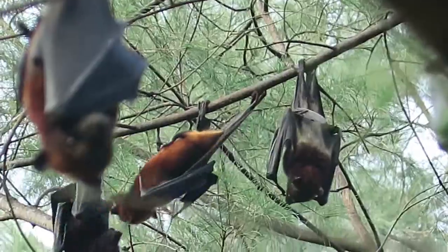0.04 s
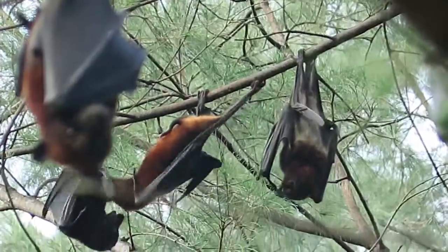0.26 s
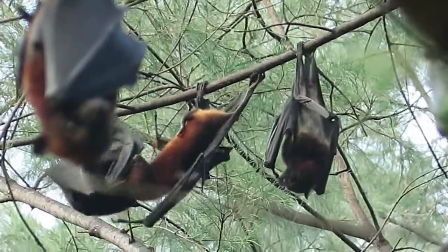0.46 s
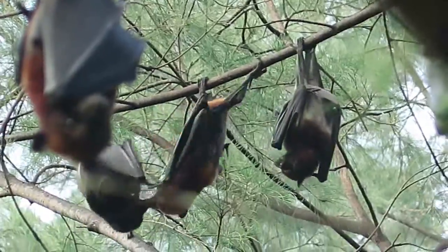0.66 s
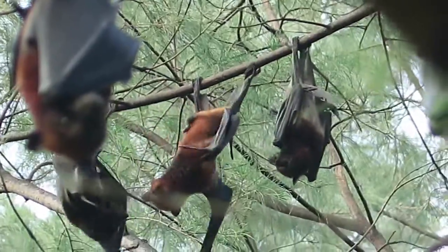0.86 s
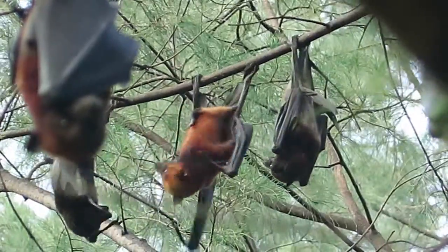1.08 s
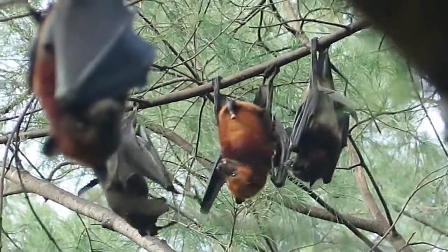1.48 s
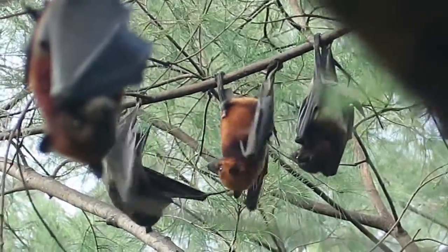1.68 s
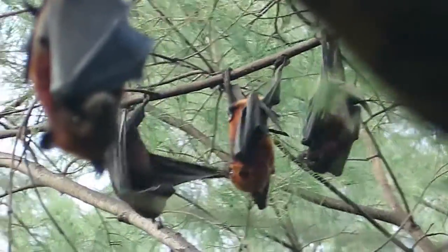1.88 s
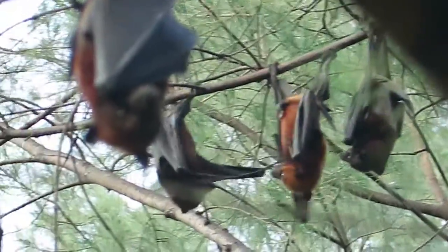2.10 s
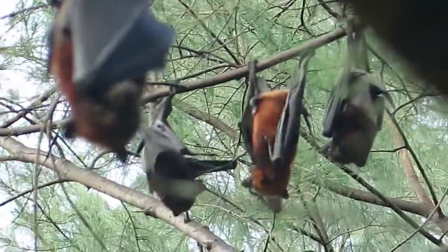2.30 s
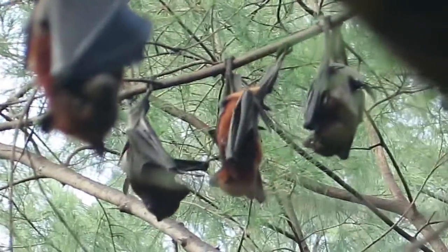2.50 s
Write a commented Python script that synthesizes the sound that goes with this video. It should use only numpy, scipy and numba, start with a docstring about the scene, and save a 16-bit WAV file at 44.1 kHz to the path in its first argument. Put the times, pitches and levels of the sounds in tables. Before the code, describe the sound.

Fruit bats squabble in a tree with five harsh, buzzing screeches and softer squawks between them. The calls weaken and break into a rattle, with a short outdoor echo, over a distant idling engine and steady hiss.

```python
"""Under a tree outdoors, an engine thumps at idle in the distance beneath a steady hiss.
A bird chirps once, and later a far whistle falls. Fruit bats squabble: five harsh screeches
break up into a rattle as the bats tire, with softer, more tonal squawks in the gaps.
Each call is a buzz of pulses and breath from the voice box, shaped by the ringing throat.
The branches scatter the calls and add a short echo."""
import sys
import numpy as np
from scipy import signal
from scipy.io import wavfile
from scipy.ndimage import uniform_filter1d
from numba import njit

SR = 44100
rng = np.random.default_rng(int(sys.argv[2]) if len(sys.argv) > 2 else 0)


def master_out(mix):
    """Clip the mix to full scale and print it as 16-bit PCM to the path in sys.argv[1]."""
    frames = np.transpose(np.atleast_2d(mix))
    ceiling = np.clip(frames, -1, 1)
    pcm = np.round(ceiling * 32767).astype(np.int16)
    wavfile.write(sys.argv[1], SR, pcm)


N = 116865
T = np.arange(N) / SR
CUTOFF_HZ = 15300  # the top of the treble

# how fast the engine idles: (time [s], firings [per s])
IDLE_SPEED = [(0, 15.8), (.7, 15.65), (1.1, 15.35), (1.6, 15.0), (2.65, 15.3)]
# the three thumps of each firing: (delay [s], relative level [dB])
FIRING_THUMPS = [(0, -8), (.012, -10), (.031, -14)]
# the notes at which the exhaust rings: (frequency [Hz], width [Hz], relative level [dB])
EXHAUST_RINGS = [(74.2, 17.7, 2), (129.5, 42, 0.5), (241.7, 70, -3), (380, 100, -9.5)]
# the outdoor air, from rumble to hiss: (frequency [Hz], relative level [dB per Hz])
AIR_SPECTRUM = [(25, -9), (125, -2.5), (219, -8.5), (243, -13), (604, -16.5), (903, -19), (1150, -23.5),
                (2430, -25), (8100, -32), (9520, -32), (15000, -43.5)]
# how alike the air sounds in both ears: (frequency [Hz], likeness [0-1])
AIR_LIKENESS = [(60, 1), (150, 0.92), (300, 0.18), (700, 0.36), (2000, 0.5), (10000, 0)]
# the rising chirp and the far falling whistle: (time [s], pitch [Hz], level [dB])
RISING_CHIRP = [(.179, 2670, -36), (.186, 2780, -28), (.191, 3260, -38.5), (.203, 3390, -43),
                (.235, 3830, -48)]
FALLING_WHISTLE = [(.85, 1853, -47), (1.0, 1871, -45), (1.12, 1788, -63), (1.3, 1763, -49),
                   (1.48, 1621, -40.5), (1.63, 1360, -52.5), (1.85, 1114, -54)]
# how loud the bats are, one list for each call: (time [s], level [dB])
SCREECH_LEVELS = [
    [(.255, -38.5), (.29, -25), (.3, -32)],
    [(.43, -30.5), (.437, -28), (.45, -14), (.485, -18), (.505, -23.5), (.55, -19.5), (.585, -17),
     (.627, -14.5), (.645, -23.5)],
    [(.777, -25), (.785, -21.5), (.791, -13.5), (.82, -16.5), (.838, -26), (.854, -15), (.878, -19),
     (.91, -20), (.95, -21), (.99, -19), (1.04, -17), (1.06, -19.5), (1.095, -24), (1.135, -20),
     (1.17, -21.5), (1.262, -21), (1.28, -30.5)],
    [(1.459, -28.5), (1.492, -18.5), (1.503, -19), (1.518, -30.5), (1.548, -27), (1.553, -21.5),
     (1.61, -23), (1.68, -31.5), (1.708, -25), (1.73, -31.5), (1.765, -30), (1.795, -36), (1.834, -28.5)],
    [(2.004, -31.5), (2.04, -27), (2.072, -38.5), (2.1, -28), (2.145, -30.5), (2.205, -37.5), (2.26, -33.5),
     (2.315, -41.5), (2.352, -32), (2.381, -36.5)],
]
SQUAWK_LEVELS = [
    [(.335, -40), (.36, -32), (.405, -33)],
    [(.65, -36.5), (.672, -26.5), (.692, -32.5), (.72, -16.5), (.738, -25.5), (.752, -31.5)],
    [(1.305, -42), (1.335, -28.5), (1.345, -24), (1.357, -30), (1.405, -24.5), (1.436, -27.5)],
    [(1.88, -33), (1.925, -34.5), (1.945, -37), (1.963, -29.5), (1.977, -39)],
    [(2.57, -55), (2.606, -46)],
]
# the buzz of the voice box: (time [s], pitch [Hz], roughness [0-1], squeal [0-1])
SCREECH_BUZZ = [(.255, 937, 0.65, 0.2), (0.297, 863, 0.36, 0.24), (0.432, 649, 0.25, 0),
                (0.449, 900.7, 0.3, 0.53), (0.49, 853.5, 0.37, 0.24), (0.534, 856, 0.51, 0.04),
                (0.611, 993, 0.74, 0.05), (.643, 721, 0.31, 0.4), (0.775, 796, 0.28, 0),
                (0.794, 1000, 0.62, 0.27), (0.823, 947, 0.63, 0.3), (0.835, 757, 0.34, 0.6),
                (0.849, 967.5, 0.16, 1), (0.865, 1019, 0.3, 0.47), (0.896, 937, 0.16, 0.4),
                (.912, 947.5, 0.22, 0.27), (0.926, 971, 0.4, .7), (0.961, 978, 0.39, 0.4),
                (0.981, 953, 0.22, 0.6), (1.017, 919.7, 0.15, 0.5), (1.043, 933.6, 0.23, 0.52),
                (1.064, 922.5, 0.62, 0.55), (1.273, 890, 1.01, 0.09), (1.489, 938, 0.68, 0.46),
                (1.829, 961, 0.89, 0.1), (1.999, 923, 0.28, 0.5), (2.018, 998, 0.49, 0.14),
                (2.081, 1010, .5, .4), (2.098, 1094, 0.24, 0.52), (2.135, 1000, .22, 0.19),
                (2.2, 993, 0.71, 0.5)]
SQUAWK_BUZZ = [(0.338, 402.4, 0.52, 0), (0.362, 487, 0.47, 0), (0.378, 575, 0.35, 0.37),
               (0.404, 425, 0.2, 0.4), (0.676, 682, 0.56, 0.1), (0.699, 819, 0.05, 0.25),
               (0.717, 876, 0.11, 0.37), (0.735, 849.6, 0.02, 0.1), (0.751, 654, .05, 0),
               (1.307, 527, 0.81, 0), (1.336, 541.7, 0.39, 0.05), (1.355, 655, 0.05, 0),
               (1.369, 762.6, 0.08, 0), (1.385, 740, 0.08, 0), (1.398, 812, 0.05, 0.1),
               (1.411, 829, 0, 0.36), (1.425, 687.7, 0.14, 0.01), (1.438, 593, 0.42, 0),
               (1.884, 891, 0.21, 0.75), (1.929, 955, 0.36, 0.55), (1.956, 881, 0.46, 0.31)]
# the rattle that chops the buzz: (time [s], beats [per s], depth [0-1])
SCREECH_CHOP = [(0.433, 423, 0.7), (0.914, 173, 0.06), (.93, 160.5, 0.63), (0.978, 152, 0),
                (1.041, 189, 0.02), (1.091, 155, 0.71), (1.136, 214, 0), (1.2, 131, 0.59),
                (1.27, 177, 0.39), (1.474, 140, 0), (1.509, 135, 0.94), (1.539, 135, 0.1),
                (1.564, 163, 0.01), (1.61, 146.5, 0.46), (1.661, 96, 0.24), (1.831, 72, 0.43),
                (2.009, 115, 0.26), (2.04, 100, 0.83), (2.112, 110, 0.4), (2.222, 90, 0.6),
                (2.361, 110, 0.38)]
SQUAWK_CHOP = [(0.339, 230, 0.38), (0.709, 200, 0), (1.321, 190, 0.36), (1.42, 230, 0.06),
               (1.881, 290, 0.98), (1.977, 223, 0.48)]
# where the throat rings and where it swallows sound: (time [s], four rings [Hz], notch [Hz])
SCREECH_RINGS = [(.28, 2620, 6640, 8600, 8700, 12900), (0.431, 2430, 5300, 8000, 9100, 13000),
                 (0.458, 3050, 6200, 8780, 9400, 13800), (.52, 2600, 6730, 8200, 9850, 14700),
                 (.575, 3140, 7400, 9100, 10300, 14300), (.63, 2810, 5750, 8100, 10800, 14240),
                 (0.802, 2840, 6240, 10100, 11300, 14700), (.86, 3000, 6430, 10100, 11450, 14600),
                 (.92, 3220, 6200, 10150, 10250, 12100), (1.021, 3110, 6000, 9000, 10960, 11800),
                 (1.1, 2950, 5560, 8900, 12900, 11250), (1.272, 2750, 5183, 8400, 12120, 10040),
                 (1.489, 2848, 5910, 8250, 10330, 11040), (1.6, 2720, 6100, 9035, 10300, 11800),
                 (1.819, 2780, 6033, 8647, 10420, 11940), (2.009, 2838, 5400, 8107, 12650, 9640),
                 (2.379, 3000, 5410, 7500, 11920, 10000)]
SQUAWK_RINGS = [(.35, 2370, 5500, 7900, 11800, 13500), (0.668, 2800, 5990, 8500, 10650, 13500),
                (.72, 2470, 6350, 8100, 11850, 13530), (1.38, 2595, 5260, 8290, 11460, 13110),
                (1.92, 2880, 5280, 8380, 11660, 9860), (1.97, 2650, 5000, 8023, 11260, 10000)]
# how broad the throat's rings are: (four widths [Hz])
SCREECH_RING_WIDTHS = [810, 1540, 1800, 2570]
SQUAWK_RING_WIDTHS = [774, 1190, 2160, 2600]
# higher rings compared with the first: (time [s], second ring [dB], top two together [dB])
SCREECH_BRIGHTNESS = [(.27, 4.5, 1.5), (.3, -8, -9), (0.449, -12, -8.5), (.485, 0.5, 11.5), (.53, 6.5, 5.5),
                      (.58, -0.5, 3), (.63, 1, 0.5), (0.788, -3.5, -4.5), (0.813, 9.5, 15.5),
                      (0.857, -4, -2.5), (.9, 3.5, 3), (0.991, 1, 2), (1.04, 0, 0), (1.149, 1, 1.5),
                      (1.27, -4, -3), (1.499, -5, -3), (1.575, -0.5, 4), (1.679, -1.5, -0.5),
                      (1.83, -2, -4.5), (2.1, -5, -4), (2.36, -1, -4.5)]
SQUAWK_BRIGHTNESS = [(.38, -8.5, -11), (.67, -5, -13), (.72, -19.5, -20), (0.75, -3, -10), (1.32, -4, -11),
                     (1.39, -12, -15), (1.917, -5.5, -18)]


def from_db(db):
    """Turn decibels into a number to multiply by."""
    return 10 ** (np.asarray(db) / 20)


def unit_power(x):
    """Scale a sound so that its average power is 1."""
    return x / np.sqrt(np.mean(x ** 2) + 1e-20)


def in_time(rows):
    """Join the rows of a table with straight lines: one curve for each column after the time."""
    times, *columns = np.transpose(rows)
    return [np.interp(T, times, column) for column in columns]


def at_hz(rows, hz):
    """Look up a table at one frequency, with octaves evenly spaced."""
    frequencies, values = np.transpose(rows)
    return np.interp(np.log(hz), np.log(frequencies), values)


def keep_band(x, hz, kind, order=2):
    """Let through the "low" part, the "high" part or a middle "band" of a sound."""
    return signal.sosfilt(signal.butter(order, hz, kind, fs=SR, output="sos"), x)


def drift(hz):
    """A smooth random wobble, about 1 in size; more hz makes it quicker."""
    return unit_power(keep_band(rng.standard_normal(N + SR), hz, "low")[SR:])


def gate(rows, attack_s=0.0049, release_s=0.0048):
    """Fade in quickly just before a table's first time, and out after its last."""
    fade_in = np.clip((T - rows[0][0]) / attack_s + 1, 0, 1)
    return fade_in * np.exp(-np.maximum(T - rows[-1][0], 0) / release_s)


def level_out(x):
    """Hold the loudness steady over a few rattle beats."""
    power = uniform_filter1d(uniform_filter1d(x ** 2, size=500), size=400)
    return x / np.sqrt(np.abs(power) + 1e-12)


@njit
def ring_loop(x, angle, decay):
    """Feed the last two samples back in, so the sound swings like a spring."""
    y = np.zeros(len(x))
    for i in range(2, len(x)):
        push = (1 - decay * decay) / 2 * (x[i] - x[i - 2])
        y[i] = push + 2 * decay * np.cos(angle[i]) * y[i - 1] - decay * decay * y[i - 2]
    return y


def ring(x, hz, width_hz):
    """Make a sound ring at a steady or moving frequency; a narrower ring lasts longer."""
    angle = 2 * np.pi * hz / SR * np.ones(N)
    return ring_loop(x + 1e-18, angle, np.exp(-np.pi * width_hz / SR))


def engine(thump_db=-35.5, hum_db=-53.5, first_firing_s=0.01347):
    """Uneven thumps make the exhaust ring; a faint hum lies on top."""
    rate, = in_time(IDLE_SPEED)
    firing_count = np.floor(np.cumsum(rate) / SR)
    firing_s = first_firing_s + T[np.diff(firing_count, prepend=-1) > 0]
    delay_s, beat_db = np.transpose(FIRING_THUMPS)
    thump_s = firing_s[:, None] + delay_s + rng.normal(0, 0.0017, (len(firing_s), len(delay_s)))
    thump_samples = (np.abs(thump_s) * SR).astype(int)
    exhaust = 0
    for k, (hz, width_hz, db) in enumerate(EXHAUST_RINGS):
        clicks = np.zeros(N + SR)
        clicks[thump_samples] = from_db(db + beat_db + rng.normal(0, 1.9, thump_s.shape))
        exhaust = exhaust + (-1) ** k * ring(clicks[:N], hz, width_hz)
    thumps = unit_power(keep_band(exhaust, 336, "low"))
    hum = unit_power(ring(rng.standard_normal(N), hz=508.4, width_hz=2.9))
    return from_db(thump_db) * thumps + from_db(hum_db) * hum


def outdoor_air(level_db=-34.5):
    """Bands of steady noise: the rumble sits in the middle and the hiss spreads wide."""
    edges_hz = 22 * 2 ** np.arange(0, 9.6, .5)  # half an octave apart
    noise = rng.standard_normal((2, 2, N + SR // 4))
    air = 0
    for k, (low, high) in enumerate(zip(edges_hz, edges_hz[1:])):
        middle, side = keep_band(noise[k % 2], [low, high], "band")[:, -N:]
        hz = np.sqrt(low * high)
        alike = at_hz(AIR_LIKENESS, hz)
        band = np.sqrt(1 + alike) * middle + np.sqrt(1 - alike) * side * [[1], [-1]]
        air = air + from_db(at_hz(AIR_SPECTRUM, hz)) * band
    return from_db(level_db) * unit_power(air)


def bird(rows, waver, fading_db=0, octave_from_hz=3100, octave_db=-1):
    """A sliding, wavering tone; when it is high, a second tone joins an octave above."""
    hz, db = in_time(rows)
    phase = 2 * np.pi * np.cumsum(hz * (1 + waver * drift(220))) / SR
    octave = from_db(octave_db) * uniform_filter1d(1.0 * (hz > octave_from_hz), size=200)
    loudness = gate(rows) * from_db(db + fading_db * drift(18.5))
    return np.sqrt(2) * loudness * (np.sin(phase) + octave * np.sin(2 * phase))


def voice_box(buzz, waver=0.01214, jitter=0.12, squeal_waver=0.0144):
    """Shaky pulses and puffs of breath; a squeal adds a purer tone at three times the pitch."""
    hz, rough, squeal = in_time(buzz)
    rough = np.clip(rough + 0.025, 0, 1)  # the voice is never quite smooth
    squeal = np.clip(squeal, 0, .95)
    squeal_phase = 2 * np.pi * np.cumsum(hz * (1 + squeal_waver * drift(121.3))) / SR
    shaky_hz = hz * (1 + waver * drift(82.5) + jitter * rough * drift(488))
    phase = 2 * np.pi * np.cumsum(shaky_hz) / SR
    pulses = 0
    for k in range(1, 25):  # harmonics: tones at k times the pitch
        harmonic = np.cos(k * phase - 0.121 * k * k)  # high ones lag, smearing each pulse
        strength = 1 - squeal * (k % 3 > 0)  # a squeal weakens all but every third one
        top_fade = np.clip((CUTOFF_HZ - k * hz) / hz, 0, 1)
        pulses = pulses + harmonic * strength * top_fade
    breath = unit_power(rng.standard_normal(N) * (1 + np.cos(phase)))
    tone = 1.23 * squeal * (1 - rough) * np.sin(3 * squeal_phase)
    return level_out(pulses) * (1 - rough / 2) + rough * breath + tone


def rattle(chop, stumble_below_hz=152.53):
    """Quick swells and dips in loudness that chop the voice; slow beats stumble more."""
    beat_hz, depth = in_time(chop)
    stumble = 0.0543 * (stumble_below_hz / beat_hz) ** 3 * drift(66.4)
    phase = 2 * np.pi * np.cumsum(beat_hz * (1 + stumble)) / SR
    return np.exp(depth * np.cos(phase))


def throat(voice, rings, widths, brightness, leak, chest_hz=2690, top_hz=12930):
    """The throat rings at four moving frequencies; two notches make the voice hollow."""
    *centres_hz, notch_hz = in_time(rings)
    second, upper = from_db(in_time(brightness))
    gains = [1, second, upper / np.sqrt(2), upper / np.sqrt(2)]
    chest = leak * keep_band(voice, chest_hz, "low")  # low tones partly slip past the first pass
    sound = 0
    for hz, width_hz, gain in zip(centres_hz, widths, gains):
        first_pass = ring(voice, hz, width_hz)
        sound = sound + gain * level_out(ring(first_pass + chest, hz, width_hz))
    sound = sound - ring(sound, notch_hz, width_hz=1500)
    sound = sound - 0.8 * ring(sound, hz=4230, width_hz=285)  # the steady, nasal notch
    return keep_band(sound, top_hz, "low", order=8)


def bat(calls, buzz, chop, rings, widths, brightness, low_cut_hz, leak, sizzle_db=-6, flutter_db=1.58):
    """The rattling voice passes through the throat; the more forceful the call, the more it sizzles."""
    voice = keep_band(voice_box(buzz) * rattle(chop), low_cut_hz, "high", order=3)
    shaped = throat(voice, rings, widths, brightness, leak)
    loudness = sum(gate(call) * from_db(in_time(call)[0]) for call in calls)
    _, upper = from_db(in_time(brightness))
    treble = level_out(keep_band(voice, 10700, "high", order=8))
    sizzle = from_db(sizzle_db) * loudness * np.sqrt(upper) * treble
    flutter = from_db(flutter_db * drift(35.6))
    return loudness * level_out(shaped + sizzle) * flutter


def echoes(x, fade_s):
    """A cloud of tiny echoes that dies away at a rate of 60 dB in fade_s seconds."""
    cloud = rng.standard_normal(SR // 2) * from_db(-60 * T[:SR // 2] / fade_s)
    return signal.fftconvolve(x, cloud / np.linalg.norm(cloud))[:N]


def branches(calls, sway_hz=5, scatter_s=.025, scatter_db=-8, tail_db=-11.5, pan_db=-0.02):
    """Near branches scatter the treble between the ears; the trees add a short echo."""
    treble = keep_band(calls, 4860, "high", order=3)
    swing = 2 * np.pi * sway_hz * T  # the bats swing, so the scatter keeps changing
    scatter = np.cos(swing) * echoes(treble, scatter_s) + np.sin(swing) * echoes(treble, scatter_s)
    tail = np.array([echoes(calls, fade_s=1) for _ in range(2)])
    direct = calls * from_db([[pan_db], [-pan_db]])
    return direct + from_db(scatter_db) * scatter * [[1], [-1]] + from_db(tail_db) * tail


def scene():
    """Bats and birds in the trees, over the engine and the air."""
    screeches = bat(SCREECH_LEVELS, SCREECH_BUZZ, SCREECH_CHOP, SCREECH_RINGS,
                    SCREECH_RING_WIDTHS, SCREECH_BRIGHTNESS, low_cut_hz=1500, leak=0.008)
    squawks = bat(SQUAWK_LEVELS, SQUAWK_BUZZ, SQUAWK_CHOP, SQUAWK_RINGS,
                  SQUAWK_RING_WIDTHS, SQUAWK_BRIGHTNESS, low_cut_hz=800, leak=0.6)
    birds = bird(RISING_CHIRP, waver=.04) + bird(FALLING_WHISTLE, waver=0.017, fading_db=5.5)
    return branches(screeches + squawks + birds) + engine() + outdoor_air()


def record(dry):
    """Cut off the very highest treble sharply."""
    return signal.sosfilt(signal.ellip(10, .2, 90, CUTOFF_HZ, fs=SR, output="sos"), dry)


dry = scene()
out = record(dry)
master_out(out)
```